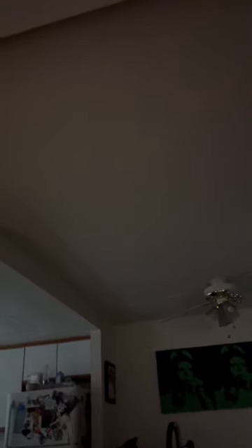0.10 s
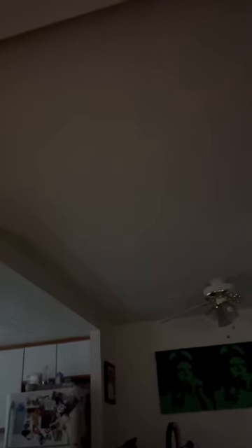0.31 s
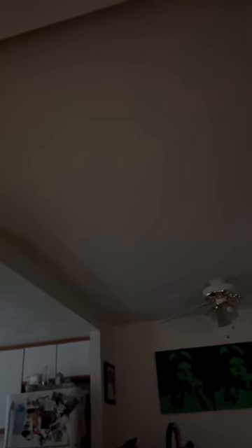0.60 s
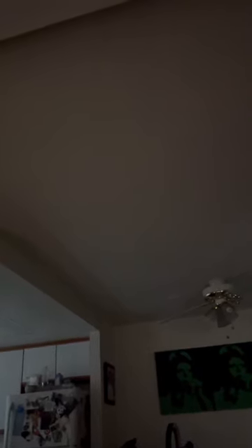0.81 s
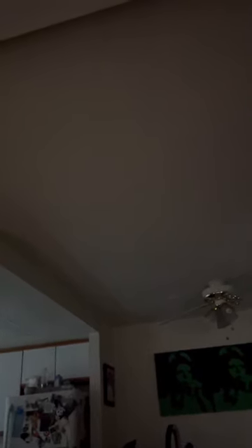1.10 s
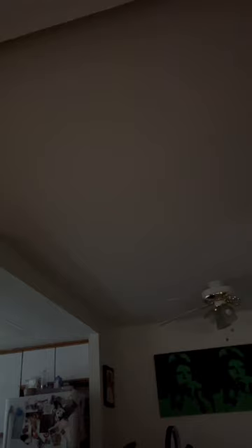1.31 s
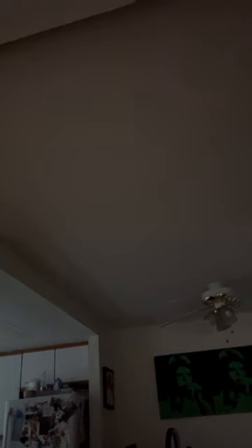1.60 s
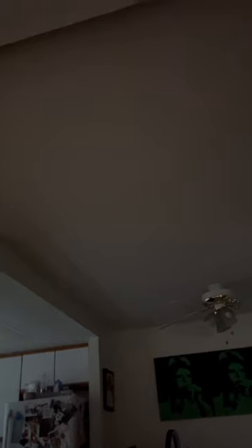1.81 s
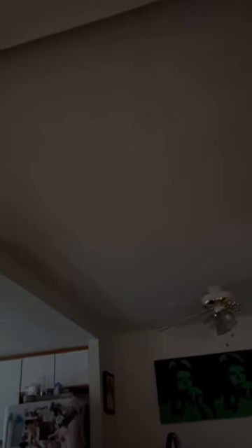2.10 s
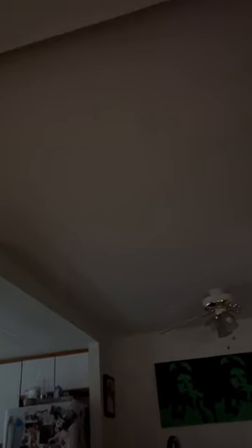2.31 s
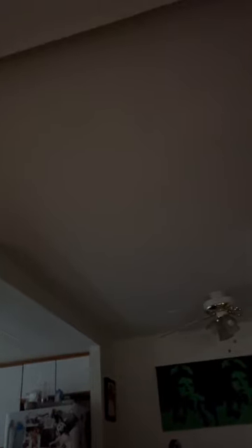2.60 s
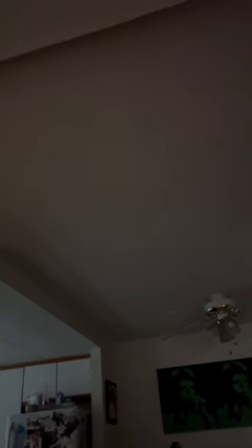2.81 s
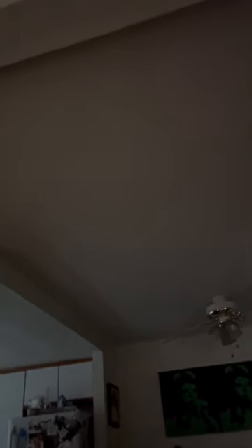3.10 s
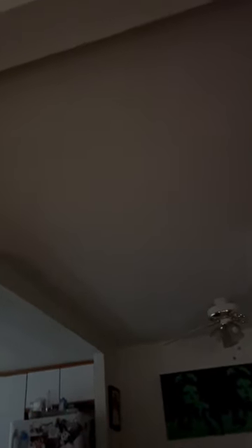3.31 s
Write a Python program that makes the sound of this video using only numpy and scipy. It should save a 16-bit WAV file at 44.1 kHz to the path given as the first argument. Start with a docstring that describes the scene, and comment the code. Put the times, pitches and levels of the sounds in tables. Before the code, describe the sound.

Muffled footsteps thump through the ceiling from the flat upstairs, with a few sharper knocks

```python
"""Footfalls in the flat upstairs, heard from the room below by a phone with two ports. Quiet room air, coloured
noise, lies under it all. Then the first knock ripples down through the boards and rings out in the room, the
step's low ceiling modes boom, and bright ticks cut through, most of them from first contact, one a high tinkle.
About two seconds in, a low 60 Hz hum, a pure tone, joins the steps and swells and sags. Late on, the hardest
knock sets off a short, rattling, woody ringing of wavering modes."""
import sys
import numpy as np
from scipy import signal
from scipy.fft import rfft, irfft
from scipy.io import wavfile
from scipy.ndimage import uniform_filter1d

SR = 44100
rng = np.random.default_rng(int(sys.argv[2]) if len(sys.argv) > 2 else 0)


def output_pcm(signal):
    """Save a mono or channel-first signal as 16-bit PCM at the path in sys.argv[1].

    Samples are clipped to [-1, 1] before scaling.
    """
    pcm = np.clip(np.atleast_2d(signal).T, -1, 1) * 32767
    wavfile.write(sys.argv[1], SR, np.round(pcm).astype(np.int16))


N = 152145  # samples in the scene

# colour of the quiet room air, sum and difference of the ports: pitch_hz, relative_db (per Hz)
AIR_MID = [(20, -11.5), (61, 6), (205, -13.5), (440, -25), (1100, -34.5), (2500, -39.5), (4000, -39.5),
           (13500, -51)]
AIR_SIDE = [(20, -6), (125, -6), (269, -8), (1090, -15.5), (2610, -22.5), (6260, -24.5), (13500, -33.5)]
# bands the port spacing cancels in their sum and in their difference: centre_hz, width_hz, gain_db
SUM_DIPS = [(2638, 440, -4.5), (6040, 540, -11), (10270, 515, -33)]
DIFF_DIPS = [(4070, 620, -10.5), (8000, 1570, -24), (11800, 1400, -15.5)]
# knocks: start_s (of the blow), level_db (before the band limits), dull_above_hz,
# clatter_length_s, clatter_db (offset), thin_below_hz
KNOCKS = [(0.228, -46, 6660, 0.089, 0, 340), (0.278, -48, 5540, 0.044, -10, 1310),
          (0.998, -70, 2500, 0.045, -20, 307), (1.454, -52.5, 4860, 0.036, 5.5, 400),
          (1.991, -66, 5020, 0.016, -2, 400), (2.546, -51, 2900, 0.029, -2, 443),
          (2.699, -39, 10800, 0.0052, 6.5, 1100), (2.7143, -32, 6700, 0.0093, 0, 834),
          (2.7249, -38, 9400, 0.033, -9, 880), (3.109, -45.5, 3010, 0.022, -0.5, 503)]
# colour of the room at the phone, sum and difference of the ports: pitch_hz, relative_db (per Hz)
ROOM_MID = [(150, 9.5), (300, 11.5), (600, -1.5), (1500, -10.5), (4000, -11), (8000, -16), (12000, -18.5),
            (14000, -27)]
ROOM_SIDE = [(150, -26), (400, -4.5), (1000, -17), (3000, -7.5), (6000, -11), (10000, -6.5), (14000, -25)]
# how long the room rings: pitch_hz, t60_s
ROOM_T60 = [(200, 0.45), (1000, 0.36), (4000, 0.37), (8000, 0.24), (13000, 0.098)]
# footsteps: start_s, deep_db, middle_db, panel_db (gain of each mode group), rise_s, t60_share (ratio)
STEPS = [(0.231, -42, -55.5, -26.5, 0.029, 0.39), (0.27, -30.5, -35, -30, 0.049, 0.47),
         (0.439, -42, -48, -50, 0.028, 1.47), (0.618, -48, -59.5, -69.5, 0.0089, 1.2),
         (0.932, -50, -49, -53, 0.051, 0.9), (1.098, -54, -65.5, -56.5, 0.047, 0.83),
         (1.262, -67.5, -53.5, -76.5, 0.046, 0.68), (1.457, -40, -52, -43.5, 0.028, 0.47),
         (1.494, -46, -42, -42, 0.011, 0.83), (1.646, -48.5, -46.5, -58, 0.056, 0.99),
         (1.877, -57.5, -53, -75, 0.062, 0.67), (2.002, -57.5, -59.5, -50.5, 0.047, 1.5),
         (2.552, -59.5, -56, -45.5, 0.028, 0.26), (2.607, -68, -70, -46.5, 0.01, 0.74),
         (2.719, -47.5, -58.5, -47.5, 0.035, 1.4), (3.11, -52.5, -50.5, -45.5, 0.036, 1.3),
         (3.301, -49, -65, -53.5, 0.05, 0.39)]
# ceiling modes in three groups: pitch_hz, relative_db, t60_s (before each step's t60_share)
DEEP_MODES = [(34.3, -19.5, 0.34), (47.81, 0.5, 0.93)]
MIDDLE_MODES = [(61.53, 10.4, 0.36), (71.04, 0.17, .6)]
PANEL_MODES = [(99.05, -4.5, 0.36), (132.7, -16, 0.3), (180.4, -27.5, 0.47), (216.6, -27.5, 0.42)]
# bright ticks, most of first contact, one a high tinkle near 0.3 s: start_s, peak_db (approximate), pitch_hz
TICKS = [(0.235, -59, 4750), (.286, -47, 3160), (.305, -56.5, 12250), (1.4578, -56.5, 8000),
         (1.4595, -52, 4700), (1.477, -54.5, 7570), (2.547, -56.5, 4050), (2.7045, -35.5, 8000),
         (3.1155, -50.5, 1162)]
# hum breakpoints: time_s, level_db (rms)
HUM = [(1.97, -78), (2.039, -46.5), (2.239, -36.5), (2.331, -40), (2.519, -42.5), (2.576, -52.5),
       (2.629, -42), (2.661, -52.5), (2.697, -44), (2.786, -46), (2.878, -43.5), (2.906, -68),
       (3.001, -59.5), (3.063, -52), (3.163, -39), (3.271, -51.5), (3.45, -63.5)]
# woody modes the hardest knock sets ringing: pitch_hz, relative_db, t60_s
WOODY_MODES = [(579.6, -3, .15), (937, -7, 0.041), (1412, 0, 0.076), (1928, -4, 0.069), (3047, -11, .25),
               (3520, -9, 0.19), (4300, -12.5, 0.43)]
# blows that ring them: start_s, gain_db
STRIKES = [(2.712, -42), (2.724, -54.5)]

AIR_DB, AIR_SIDE_DB = -67.5, -79.5  # rms before the port dips
SPREAD_S = 0.0041  # lag of 1 kHz behind the extreme treble; the lag goes as 1 / sqrt(Hz)
LEAD_S = 0.006  # the clatter swells this long before the blow lands
CLATTER_PER_S, CLATTER_SCATTER_DB = 4300, 3  # mean rate; mean random boost
ROOM_DB, ROOM_SIDE_DB = -3.5, -1.5  # room gain; difference gain relative to it
BUILD_S, DIRECT_DB = 0.00043, 22.5  # build-up time of the room noise; gain of the direct sound
TICK_CYCLES, TICK_SIDE_DB = 79, -12.5  # cycles until 60 dB down; gain into the port difference
HUM_HZ = 60.0
RATTLE_S = 0.01  # smoothing time of the woody waver
BASS_LAG_S = 0.00008  # the left port hears the bass this much after the right
TOP_HZ = 14000


def undb(db):
    """Decibels to amplitude."""
    return 10 ** (np.asarray(db) / 20)


def read(table, hz):
    """Value between (Hz, value) points on a log-frequency axis."""
    points_hz, values = np.array(table).T
    return np.interp(np.log(np.maximum(hz, 1)), np.log(points_hz), values)


def bins_hz(count):
    """Spectrum frequencies for a sound of count samples."""
    return np.arange(count // 2 + 1) * SR / count


def colour(x, table):
    """Shape a sound by a spectrum, to rms 1."""
    y = irfft(rfft(x) * undb(read(table, bins_hz(len(x)))), len(x))
    return y / np.sqrt(np.mean(y ** 2))


def add(out, x, s):
    """Mix x into out from time s."""
    i = int(s * SR)
    out[i:i + len(x)] += x[:N - i]


def ring(modes, t, share=1):
    """Sum of decaying sine modes, their t60 scaled by share."""
    return sum(undb(db - 60 * t / (t60 * share)) * np.sin(2 * np.pi * hz * t) for hz, db, t60 in modes)


def quiet_air(table, level_db):
    """The air of the room: steady noise coloured by a spectrum."""
    return undb(level_db) * colour(rng.standard_normal(N), table)


def port_dips(x, table):
    """Two spaced ports cancel bell-shaped bands in their sum or difference."""
    hz = bins_hz(len(x))
    gain_db = sum(db * np.exp(-((hz - centre) / width) ** 2) for centre, width, db in table)
    return irfft(rfft(x) * undb(gain_db), len(x))


def knocks():
    """A blow and its dense clatter ripple through the boards treble first, dulled by the ceiling."""
    out, t = np.zeros(N), np.arange(SR // 4) / SR
    phase = -4 * np.pi * SPREAD_S * np.sqrt(1000 * bins_hz(len(t)))
    ripple = irfft(np.exp(1j * phase), len(t)) * (t < 0.05)
    chance = rng.random((len(KNOCKS), 3, len(t)))
    for (s, db, dull_hz, length, clatter_db, thin_hz), (when, size, sign) in zip(KNOCKS, chance):
        # sparse random hits of either sign, swelling in and dying away
        hits = (when < CLATTER_PER_S / SR) * np.sign(sign - 0.5)
        hits = hits * np.exp(-(t / length) ** 2) * np.minimum(t / LEAD_S, 1) ** 2
        hits *= undb(clatter_db - 13.5 - CLATTER_SCATTER_DB * np.log(1 - size))
        hits[int(LEAD_S * SR)] = 1  # the blow itself
        hits = hits / np.sqrt(np.sum(hits ** 2))
        rippled = signal.fftconvolve(hits, ripple)
        band = signal.butter(2, [thin_hz, dull_hz], "bandpass", fs=SR, output="sos")
        add(out, undb(db) * signal.sosfilt(band, rippled), s - LEAD_S)
    return out


def room(table, turn=False):
    """Room response: the direct sound, and noise that builds up fast and dies band by band."""
    t = np.arange(SR // 2) / SR
    spectrum, hz = rfft(colour(rng.standard_normal(len(t)), table)), bins_hz(len(t))
    tail = np.zeros(len(t))
    for centre in 150 * 2.0 ** np.arange(8):
        # overlapping triangles, an octave apart; the lowest takes all below it
        share = np.clip(1 - np.abs(np.log2(np.clip(hz, 150, None) / centre)), 0, 1)
        tail += irfft(spectrum * share, len(t)) * undb(-60 * t / read(ROOM_T60, centre))
    response = tail * (1 - np.exp(-t / BUILD_S))
    click = colour(1.0 * (t == 0), table)
    direct = np.roll(click, 32)[:64] * np.hanning(64) / np.sqrt(len(t))
    if turn:  # a quarter turn of phase between the ports
        direct = -signal.hilbert(direct).imag
    response[:len(direct)] += undb(DIRECT_DB) * direct
    return response


def booms():
    """A heel loads the floor softly: the ceiling modes swell, then fade."""
    out, t = np.zeros(N), np.arange(SR) / SR
    for s, deep_db, middle_db, panel_db, rise, share in STEPS:
        swell = np.sin(np.pi / 2 * np.minimum(t / rise, 1)) ** 2
        body = 0
        for modes, db in ((DEEP_MODES, deep_db), (MIDDLE_MODES, middle_db), (PANEL_MODES, panel_db)):
            # offset the decay during the rise, at the rate of the group's last mode
            hold = undb(60 * np.minimum(t, rise) / (modes[-1][2] * share))
            body = body + undb(db) * ring(modes, t, share) * hold
        add(out, swell * body, s)
    return out


def ticks():
    """Brief close pairs of modes with a soft edge, heard without the room: most from first contact, one a high
    tinkle."""
    out, t = np.zeros(N), np.arange(SR // 20) / SR
    for s, db, hz in TICKS:
        t60 = TICK_CYCLES / hz
        pair = [(hz * 0.96, -6, t60), (hz * 1.05, -6, t60)]
        soft_edge = np.minimum(t / 0.00019, 1)
        add(out, undb(db) * soft_edge * ring(pair, t), s)
    return out


def hum():
    """A pure low sine whose level swells and sags between breakpoints."""
    t, (s, db) = np.arange(N) / SR, np.array(HUM).T
    level = undb(np.interp(t, s, db)) * (t > s[0])
    return np.sqrt(2) * level * np.sin(2 * np.pi * HUM_HZ * t)


def woody_ringing():
    """Short woody modes, each rattled by its own smoothed noise, heard without the room."""
    out, t = np.zeros(N), np.arange(SR // 4) / SR
    k = int(RATTLE_S * SR)
    for s, db in STRIKES:
        for mode in WOODY_MODES:
            smooth = uniform_filter1d(uniform_filter1d(rng.standard_normal(len(t)), k), k)
            waver = np.sqrt(k) * smooth
            add(out, undb(db) * (1 + waver / 2) * ring([mode], t), s)
    return out


def scene():
    """Mix every layer as sum (mid) and difference (side) of the ports, then left and right."""
    hit, bass, bright = knocks(), booms() + hum(), ticks() + woody_ringing()
    room_mid = undb(ROOM_DB) * signal.fftconvolve(hit, room(ROOM_MID))[:N]
    room_side = undb(ROOM_DB + ROOM_SIDE_DB) * signal.fftconvolve(hit, room(ROOM_SIDE, turn=True))[:N]
    mid = bass + bright + port_dips(room_mid + quiet_air(AIR_MID, AIR_DB), SUM_DIPS)
    side = port_dips(room_side + quiet_air(AIR_SIDE, AIR_SIDE_DB), DIFF_DIPS)
    side += undb(TICK_SIDE_DB) * signal.hilbert(bright).imag
    side -= BASS_LAG_S / 2 * SR * np.gradient(bass)  # the slope of the bass acts as a tiny delay
    return np.array([mid + side, mid - side])


def record(dry):
    """The phone cuts the top with a steep low-pass."""
    return signal.sosfilt(signal.ellip(8, 0.2, 70, TOP_HZ, fs=SR, output="sos"), dry)


dry = scene()
out = record(dry)
output_pcm(out)
```